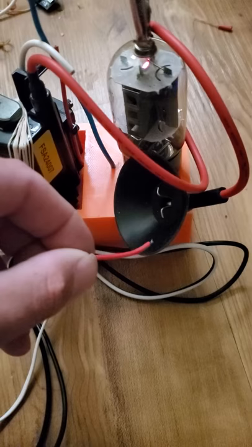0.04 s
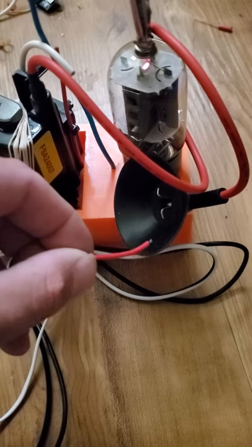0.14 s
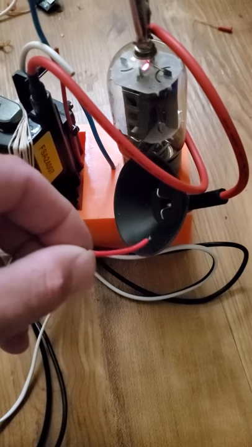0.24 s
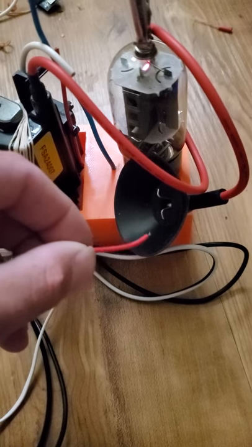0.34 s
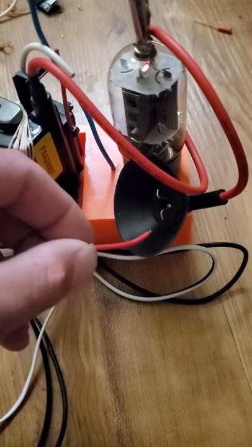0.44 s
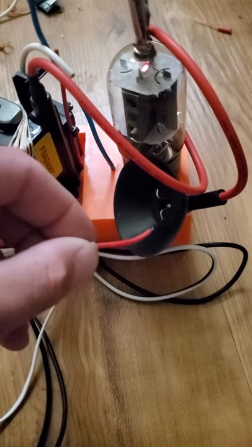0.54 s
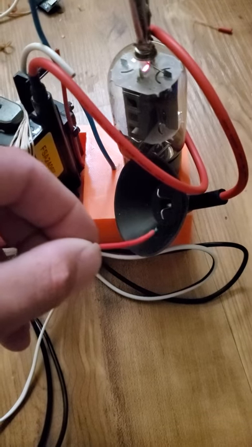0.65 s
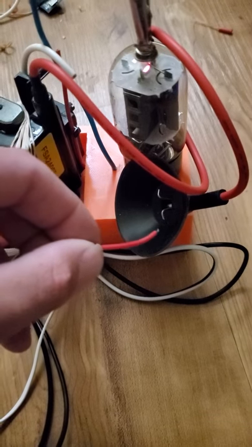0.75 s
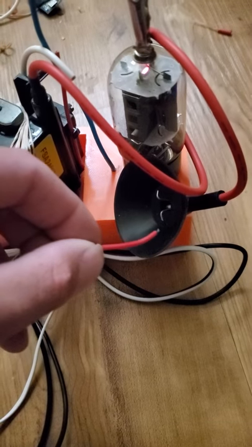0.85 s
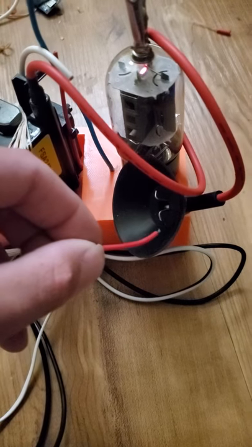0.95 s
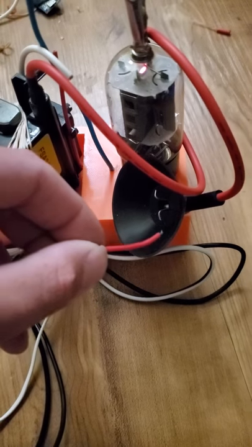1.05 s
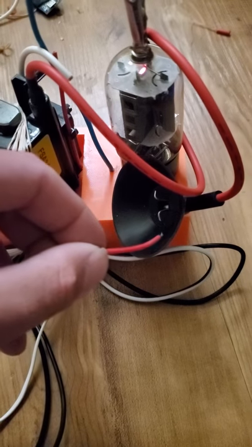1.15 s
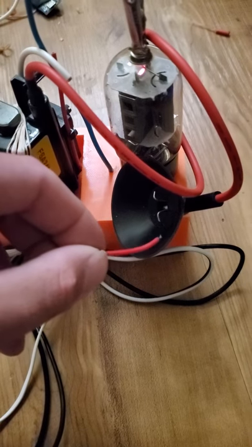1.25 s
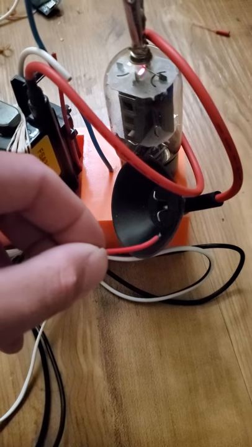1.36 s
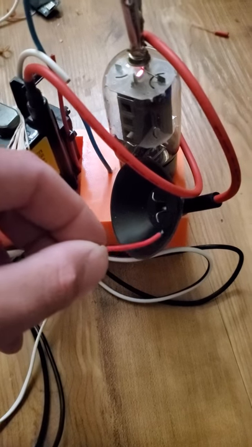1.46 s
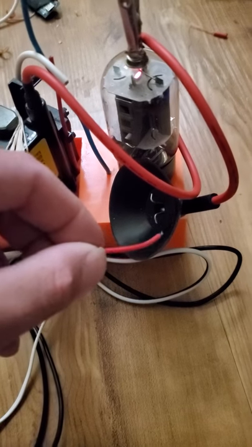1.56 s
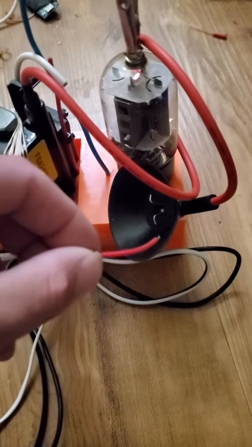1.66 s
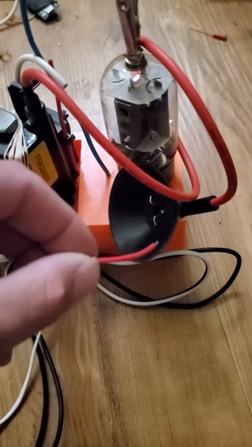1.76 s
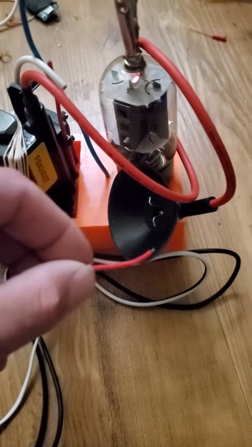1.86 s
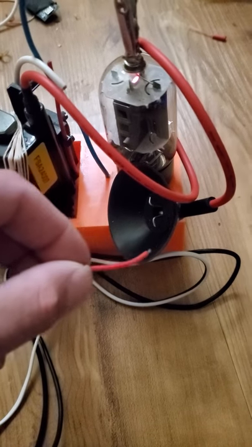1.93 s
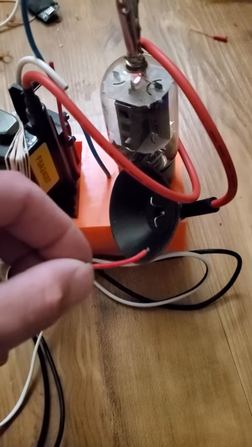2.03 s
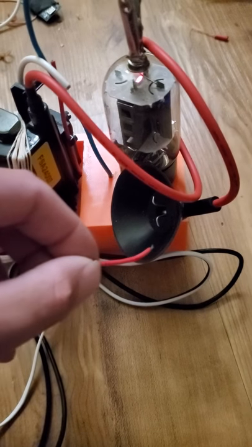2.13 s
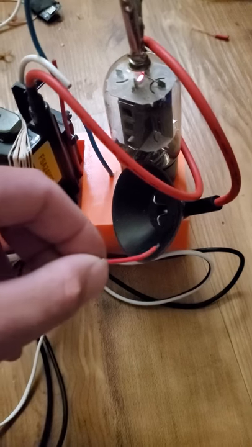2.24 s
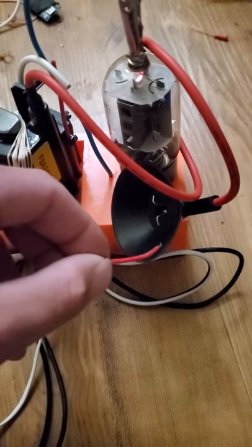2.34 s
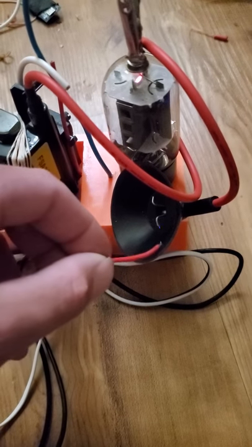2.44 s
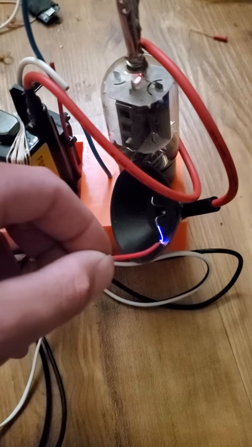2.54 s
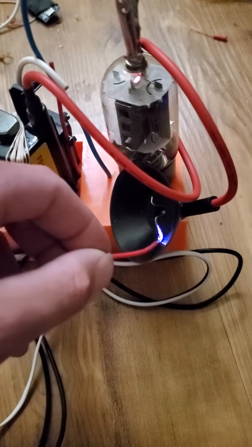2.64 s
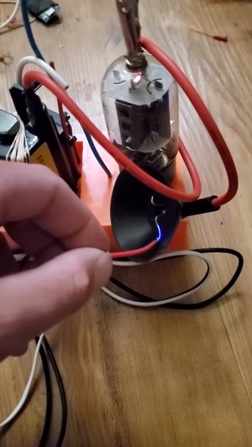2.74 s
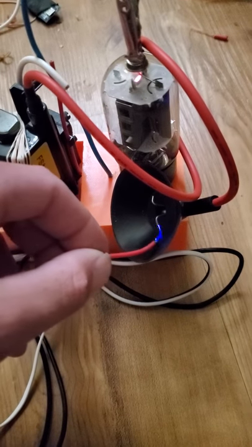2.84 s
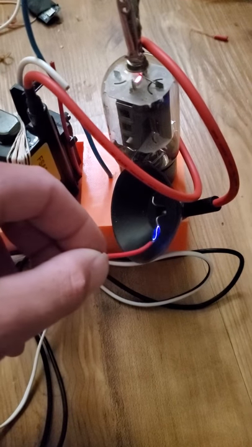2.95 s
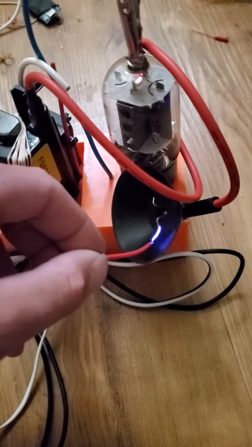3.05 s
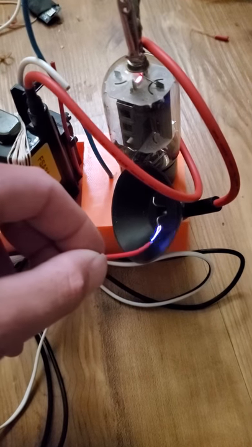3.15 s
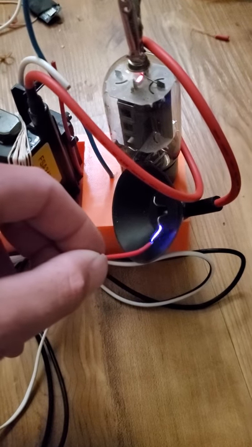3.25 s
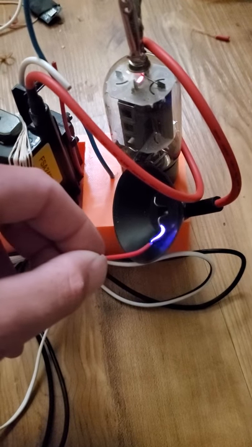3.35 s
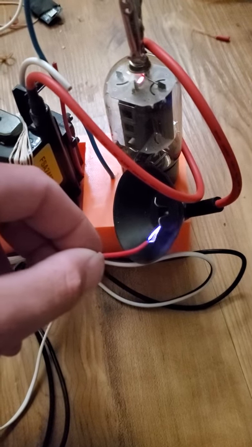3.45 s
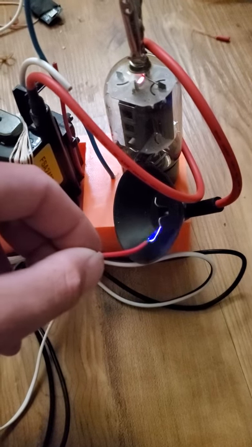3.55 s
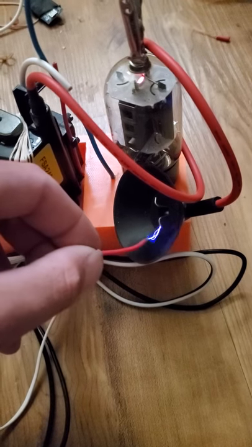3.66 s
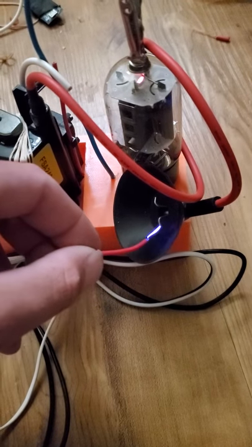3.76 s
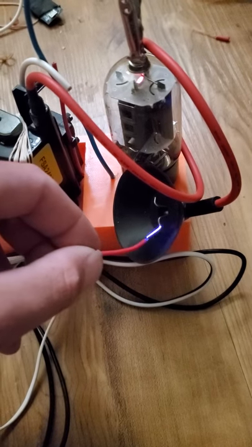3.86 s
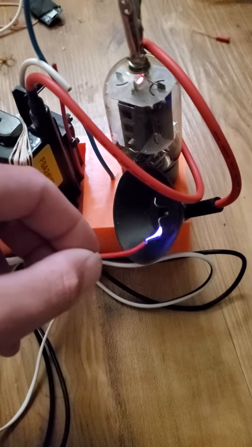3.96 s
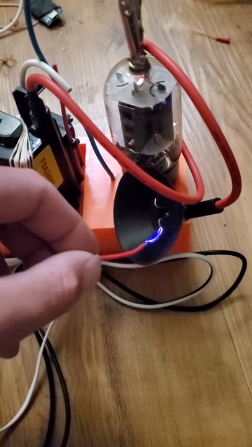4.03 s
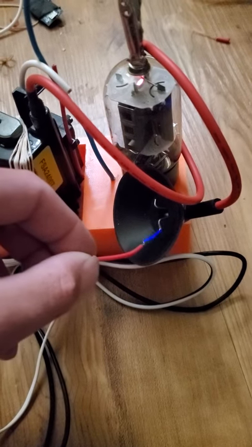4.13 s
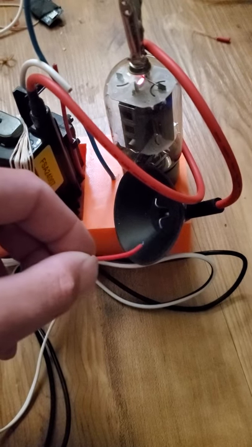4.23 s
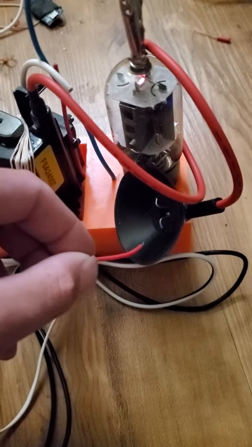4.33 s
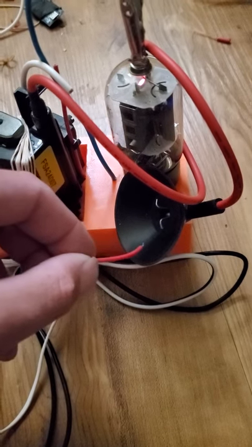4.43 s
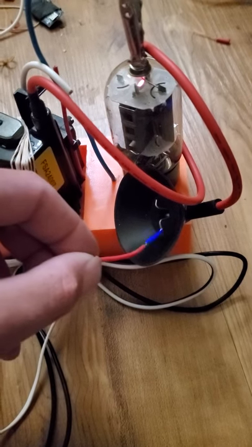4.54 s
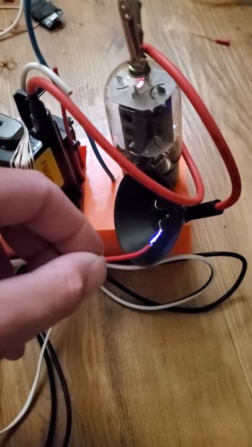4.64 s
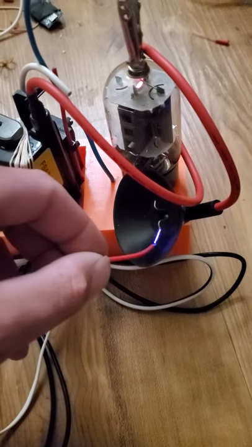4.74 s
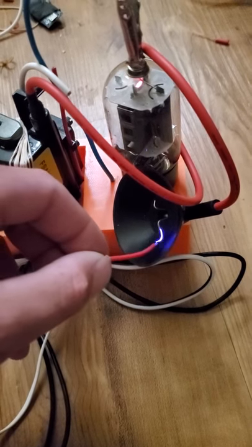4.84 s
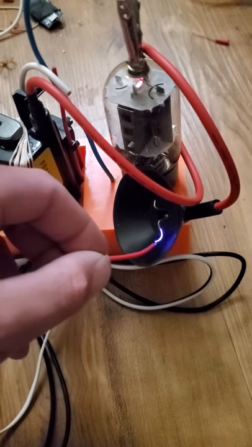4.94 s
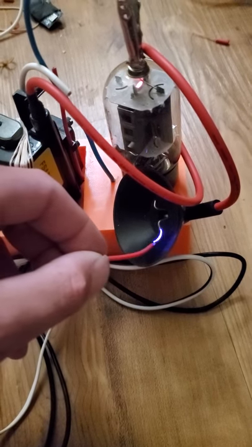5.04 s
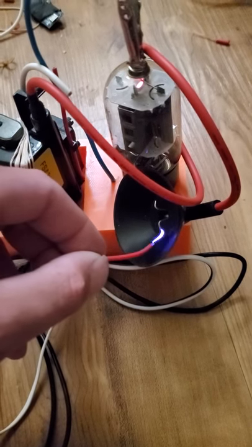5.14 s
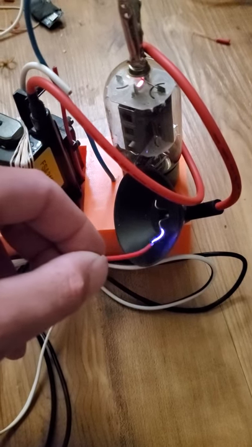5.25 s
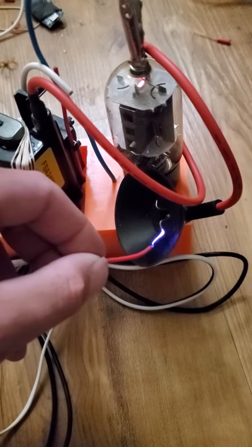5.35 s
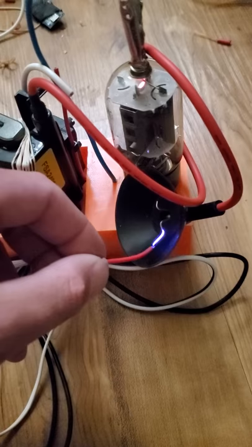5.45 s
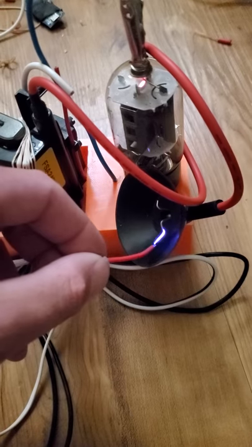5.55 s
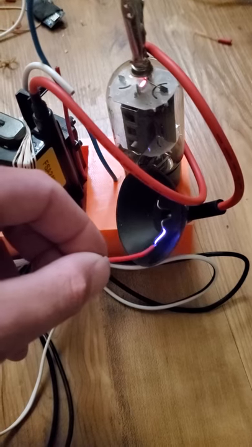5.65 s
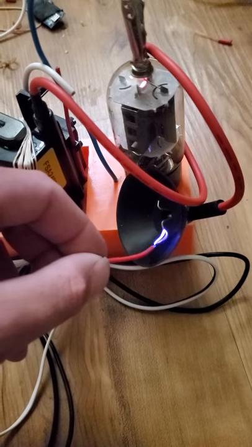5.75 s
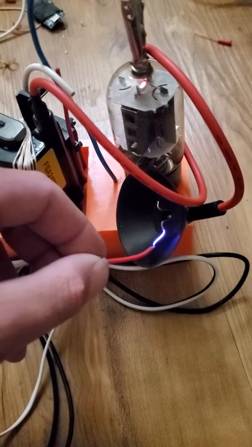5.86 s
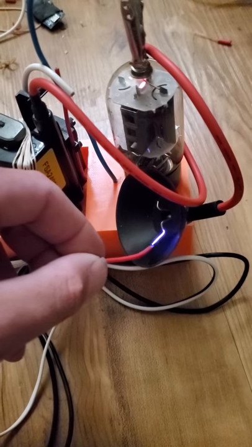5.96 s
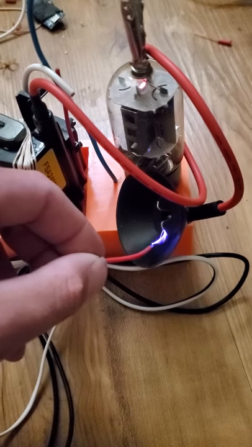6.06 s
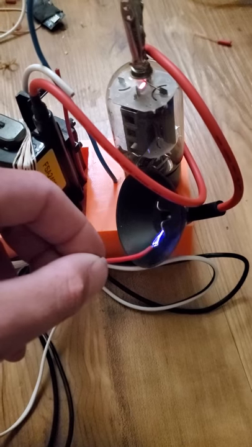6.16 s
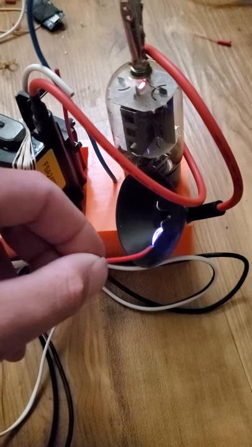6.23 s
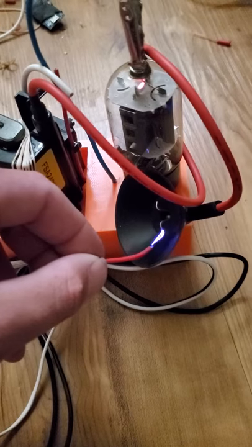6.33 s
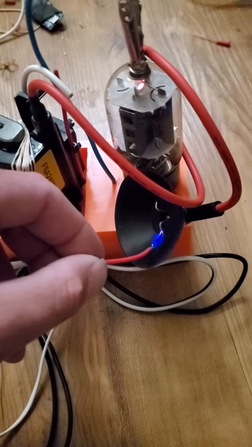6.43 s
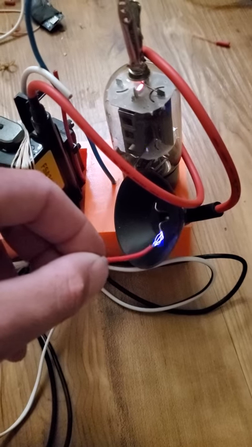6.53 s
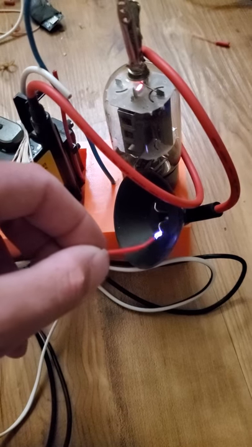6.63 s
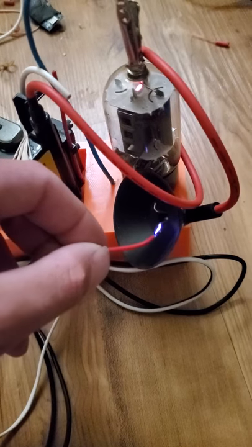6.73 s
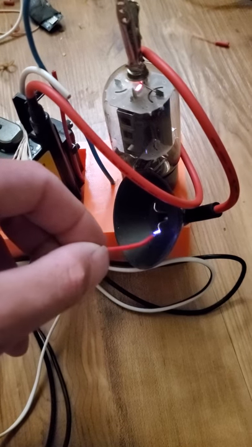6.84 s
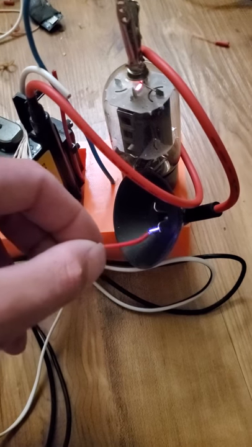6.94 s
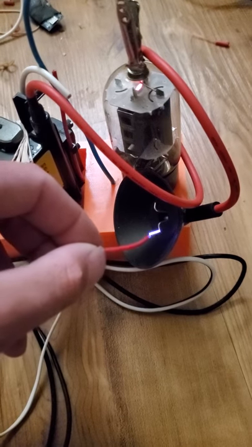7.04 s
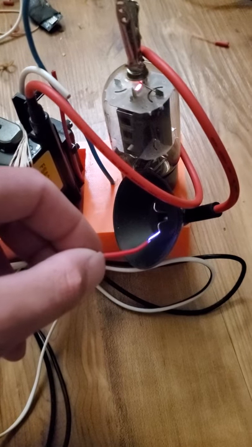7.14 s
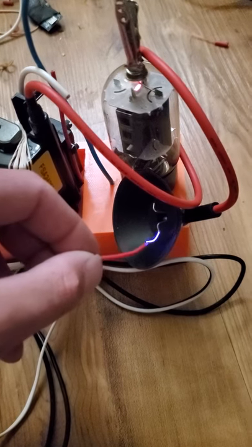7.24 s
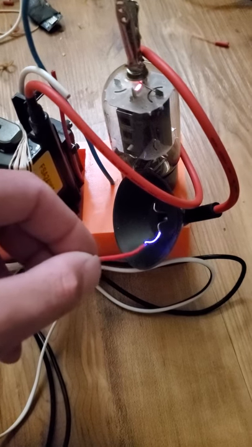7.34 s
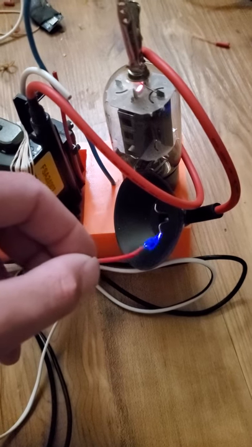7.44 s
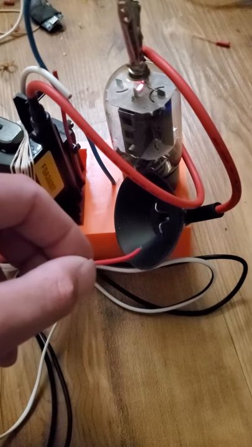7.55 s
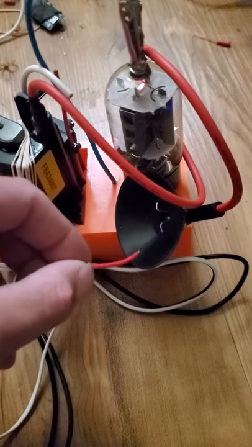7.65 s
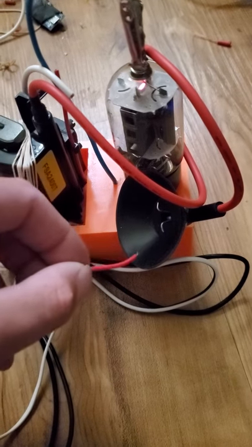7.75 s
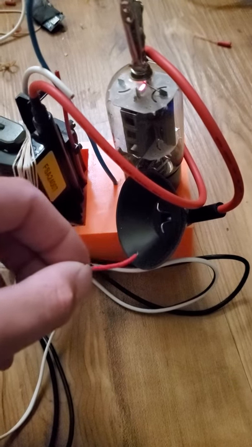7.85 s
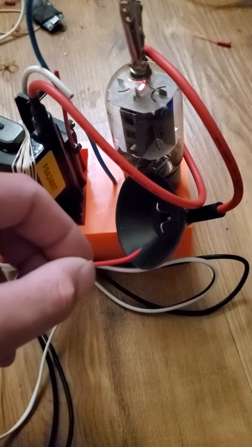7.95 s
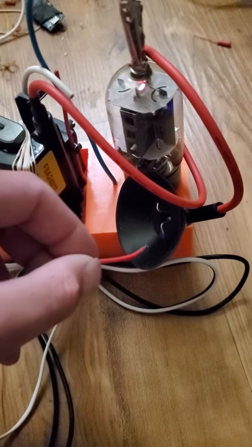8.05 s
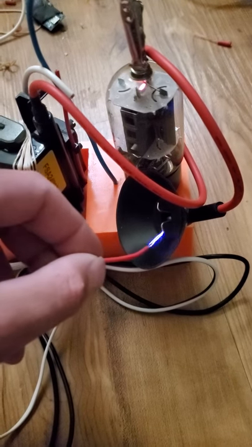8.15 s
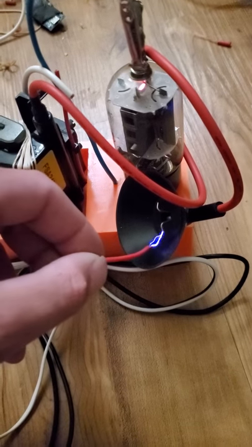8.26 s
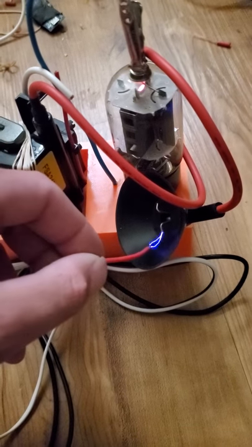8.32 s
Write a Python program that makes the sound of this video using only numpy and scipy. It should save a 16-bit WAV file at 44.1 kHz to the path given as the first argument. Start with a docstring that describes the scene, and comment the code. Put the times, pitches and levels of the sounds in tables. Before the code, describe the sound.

A high-voltage transformer whines thinly at a very high pitch, close and slightly to the left, sinking a little over a faint fan and low mains hum. At about 2.5 seconds a brief hiss leads into sharp snapping sparks, and the background drops. From 3 to 4 seconds loud sizzling arcs alternate with crackles, pushing the whine louder and slightly higher, with flashes of a tone an octave lower. After a lull, sparks snap again around 4.6 seconds and a nearly silent arc holds the whine. From 5.1 to 6.4 seconds the arcs sizzle almost continuously, repeatedly singing the lower tone. A quick volley of sparks at 6.5 seconds becomes a rough, raspy squeal lasting until 7.2. A few snaps follow around 7.4, the idle whine returns, and the last sparks crackle just after 8 seconds. The room sounds small and fairly dry.

```python
"""A valve-driven flyback transformer on a wooden table, left of a hand-held pair of microphones.
It whines near 8 kHz over a fan and mains hum, sinking as the valve warms. At 2.5 s a lead nears the
high-voltage terminal: corona hisses, sparks snap across, then sizzling arcs hold and pull the whine sharp.
At times an arc settles on every second cycle and sings an octave lower. From 6.6 s it restrikes more
slowly in a rough squeal; the idle whine returns, and the last sparks snap just after 8 s."""
import sys
import numpy as np
from scipy import signal
from scipy.fft import rfft, irfft, next_fast_len
from scipy.io import wavfile
from scipy.ndimage import uniform_filter1d

SR = 44100
rng = np.random.default_rng(int(sys.argv[2]) if len(sys.argv) > 2 else 0)


def dump(signal):
    """Clip the signal to [-1, 1] and save it as 16-bit WAV at the path in sys.argv[1]."""
    limited = np.clip(np.atleast_2d(signal).T, -1, 1)
    pcm = np.round(limited * 32767).astype(np.int16)
    wavfile.write(sys.argv[1], SR, pcm)


N = 369999
TIME = np.arange(N) / SR
ARC_EDGE_S = 0.005

# arcs that hold, loud or almost silent: start/s, end/s, whine f/Hz, sizzle level/dB
ARCS = [(3.039, 3.123, 8236, -19.5), (3.205, 3.27, 8290, -22), (3.274, 3.432, 8180, -21),
        (3.482, 3.533, 8230, -21), (3.726, 3.885, 8338, -26.5), (3.886, 4.025, 8280, -23),
        (4.703, 5.101, 8204, -48.5), (5.136, 5.369, 8273, -18.5), (5.372, 5.569, 8349, -18),
        (5.575, 5.754, 8341, -18.5), (5.764, 6.08, 8300, -19), (6.205, 6.384, 8266, -18.5),
        (6.685, 6.731, 8295, -42), (7.204, 7.38, 8224, -46.5)]
# one table a squeal: t/s, restrike f/Hz, level/dB, unevenness/periods
SQUEALS = [
    [(6.613, 3083, -16, 0.072), (6.63, 2960, -17, 0.038), (6.66, 2900, -18.5, 0.083),
     (6.691, 2550, -19, 0.23)],
    [(6.728, 2590, -17, 0.28), (6.8, 2771, -21, 0.19), (6.9, 2888, -21.5, 0.12), (7.0, 3014, -20, 0.049),
     (7.07, 2897, -20, 0.081), (7.15, 2880, -17, 0.12), (7.198, 2738, -20, 0.2)],
]
# decay of the room: f/Hz, t60/s
ROOM_DECAY = [(300, .4), (3000, 0.22), (8000, 0.27), (15000, 0.14)]


def whine(phase, db, lean_db, load, flutter_db=2.5, gain_db=-4):
    """The core sings at the switching rate; the arc's load shakes it. A thin steady tone lies above."""
    core = amp(db + gain_db + flutter_db * load * wander(rate_hz=105)) * pair(phase, lean_db, lead=0.77)
    thin_gain = amp(-68 + 3 * wander(rate_hz=3))
    thin_phase = 2 * np.pi * np.cumsum(15635 + 8 * wander(rate_hz=5)) / SR
    return core + thin_gain * pair(thin_phase, lean_db=-2.5, lead=0.5)


def oscillator(bursts, settled, idle_hz=8042, cold_hz=74.7, warm_up_s=0.65):
    """Pitch, level and lean of the whine: sparks drag it flat, an arc pulls it sharp and loud."""
    # standing waves of the idle whine at the hand-held microphones: t/s, level/dB, left-right/dB
    standing_waves = [(0, -46, 9), (0.1, -53, 16), (0.2, -43, -3), (0.28, -51, 15), (0.42, -41, 11),
                      (0.58, -41.5, 3.5), (1.14, -38.5, 9.5), (1.75, -41.5, 12.5), (2.12, -41, 3),
                      (2.36, -40.5, 2), (2.8, -42.5, 10), (4.2, -47.5, 6), (4.44, -48.5, 13),
                      (7.55, -46, 7.5), (7.8, -44, 9), (8.1, -43.5, 0)]

    def toward(state, share, hz, db, lean_db):
        return [now + np.clip(share, 0, 1) * (new - now) for now, new in zip(state, (hz, db, lean_db))]

    state = [idle_hz + cold_hz * np.exp(-TIME / warm_up_s), *follow(standing_waves, TIME)]
    state = toward(state, nearness(bursts, reach_s=0.054), hz=7970, db=-38.5, lean_db=7.5)
    for start, end, hz, _ in ARCS:
        state = toward(state, gate(start, end, ARC_EDGE_S), hz, db=-32, lean_db=12)
    hz, db, lean_db = toward(state, settled, hz=8146, db=-27.5, lean_db=12)
    squealing = sum(gate(rows[0][0], rows[-1][0], ARC_EDGE_S) for rows in SQUEALS)
    db = db + squealing * (-58 - db)  # a squeal all but stops the whine
    return lag(hz, s=0.009), lag(db, s=0.0095), lag(lean_db, s=0.0095)


def burning(flare_db=4, flare_s=0.03, sputter_db=1.74):
    """Strength of the arc: it flares as it catches and sputters as it burns."""
    held = sum(amp(db + flare_db * np.exp(-abs(TIME - start) / flare_s)) * gate(start, end, ARC_EDGE_S)
               for start, end, _, db in ARCS)
    return held * amp(sputter_db * wander(rate_hz=16))


def sizzle(phase, strength, settled, flicker_db=2, surge_db=1.84, calm_db=8, spit_share=0.014, spit_db=13):
    """The arc reignites on every cycle, each time with another strength; now and then it spits."""
    # spectrum of the arc: f/Hz, level/dB
    spectrum = [(250, -38.5), (700, -32), (1250, -29.5), (1650, -12.5), (2800, -3), (3900, -3.5),
                (4500, -6), (6000, -7), (7600, -13), (9200, -22.5), (10200, 2), (12500, 1.5), (14400, 4.5),
                (15800, -22.5)]
    ignitions = np.flatnonzero(np.diff(np.floor(phase / (2 * np.pi))))
    count = len(ignitions)
    size, late = rng.standard_normal((2, N))[:, :count]
    spits = rng.random(N)[:count] < spit_share
    size = unit(np.where(spits, np.sign(size) * amp(spit_db), size)) * np.sqrt(N / count)
    restless = flicker_db * wander(rate_hz=460) + surge_db * wander(rate_hz=34)
    envelope = strength * amp(-3.5 + restless - calm_db * settled)  # a settled arc hisses less
    size = np.tanh(size * envelope[ignitions])  # one cycle holds only so much charge
    return colour(clicks(ignitions / SR + 1e-5 * late, size), spectrum)


def lengthen(hiss, whine_hz, body_db_per_hz=0.0325, plain_hz=8240, body_hz=6500):
    """A longer arc, told by its sharper whine, sizzles with more body."""
    body = signal.sosfiltfilt(signal.butter(2, body_hz, fs=SR, output="sos"), hiss)
    return hiss + body * (amp(body_db_per_hz * (whine_hz - plain_hz)) - 1)


def settling(edge_s=0.0042, swell_db=5, full_db=-27.5):
    """How settled the arc is (0-1), and the gain of its lower octave, which swells until it breaks up."""
    # the arc settles on every second cycle: start/s, end/s, lower octave level/dB
    locks = [(3.089, 3.113, -31), (3.228, 3.241, -30.5), (3.31, 3.33, -22.5), (3.397, 3.424, -25.5),
             (3.51, 3.525, -22), (3.785, 3.86, -39), (3.966, 4.025, -27), (4.733, 4.747, -35.5),
             (4.802, 4.829, -45), (5.293, 5.365, -25), (5.404, 5.456, -29.5), (5.488, 5.522, -30),
             (5.704, 5.758, -21.5), (5.77, 5.811, -29), (6.027, 6.076, -22.5), (6.256, 6.307, -23.5),
             (6.318, 6.359, -28)]
    settled, gain = np.zeros((2, N))
    for start, end, db in locks:
        at = (TIME > start) & (TIME < end)
        progress = (TIME[at] - start) / (end - start)
        held = gate(start, end, edge_s)[at]
        settled[at] = min(amp(db - full_db), 1) * held
        gain[at] = amp(db + swell_db * (progress - 1 / 2)) * held
    return settled, gain


def undertone(phase, gain, shake_db=5, sputter_db=5, firm_db=-25):
    """Strong and weak cycles alternate, giving half and quarter multiples of the whine."""
    # partials of the settled arc: multiple of the whine, level/dB
    partials = [(1 / 4, -23), (1 / 2, 0), (3 / 4, -20), (5 / 4, -10), (3 / 2, -1), (7 / 4, -8)]
    loose = np.clip(1 - gain / amp(firm_db), 0, 1)  # a weak hold sputters
    sputter = amp(sputter_db * loose * np.minimum(wander(rate_hz=150), 1))
    tones = sum(amp(db + shake_db * wander(rate_hz=12.7)) * pair(k * phase, lean_db=6, lead=1.33)
                for k, db in partials)
    return amp(-2.5) * gain * sputter * tones


def spark_bursts(snap_s=0.001, jitter_s=0.0008, spread_db=1):
    """Every snap across the gap, alone or in a volley, as rows of t/s, length/s, level/dB."""
    # lone bursts of sparks: t/s, length/s, level/dB
    lone_bursts = [(2.5572, 0.002, -14.5), (2.589, 0.0045, -14.5), (2.6206, 0.0051, -15),
                   (2.635, 0.001, -7.5), (2.647, 0.016, -17.5), (2.7496, 0.00046, -14),
                   (2.9167, 0.0007, -13.5), (2.93, 0.0041, -17), (2.942, 0.00056, -10),
                   (2.976, 0.0034, -14), (2.996, 0.00071, -15), (3.039, 0.025, -20.5), (3.155, 0.013, -15),
                   (3.1885, 0.013, -15.5), (3.229, 0.009, -21), (3.3447, 0.00082, -10),
                   (3.3542, 0.02, -18.5), (3.4456, 0.01022, -14), (3.4864, 0.005, -25),
                   (3.5744, 0.0011, -11), (3.5789, 0.029, -16), (3.625, 0.00071, -10.5),
                   (3.643, 0.0016, -14.5), (3.6597, 0.00074, -9), (3.6874, 0.0048, -13.5),
                   (3.7174, 0.0061, -13.5), (4.6645, 0.0082, -14.5), (4.6845, 0.018, -15),
                   (5.106, 0.0074, -23.5), (5.382, 0.013, -21), (5.698, 0.006, -22), (5.761, 0.0097, -15),
                   (5.845, 0.0099, -20.5), (6.0763, 0.0044, -16.5), (6.141, 0.018, -15),
                   (6.189, 0.01268, -15), (6.21, 0.0013, -17), (6.602, 0.0065, -14.5),
                   (7.372, 0.00204, -24.5), (7.395, 0.0065, -14), (7.424, 0.0024, -18),
                   (7.444, 0.0015, -12.5), (8.1432, 0.0018, -13.5), (8.1725, 0.01, -15),
                   (8.203, 0.0098, -18), (8.2264, 0.014, -16), (8.342, 0.00087, -17)]
    # the gap recharges and snaps over and over: start/s, end/s, snap rate/Hz, level/dB
    volleys = [(2.668, 2.694, 94, -19.5), (3.011, 3.038, 227, -13.5), (3.549, 3.567, 170, -13.5),
               (3.697, 3.715, 170, -17), (4.633, 4.658, 112, -13.5), (6.099, 6.128, 175, -10),
               (6.516, 6.595, 105, -12.5), (8.2527, 8.322, 99, -15)]
    bursts = list(lone_bursts)
    for start, end, rate, db in volleys:
        chance = rng.standard_normal((64, 2))
        for s, (late, size) in zip(np.arange(start, end, 1 / rate), chance):
            bursts.append((s + jitter_s * late * (s > start), snap_s, db + spread_db * size))
    return bursts


def sparks(bursts, strikes_hz=4500, spread_db=3, fade_db=2):
    """Each burst is a run of uneven breakdowns that fades a little."""
    # spectrum of a spark: f/Hz, level/dB
    spectrum = [(150, -28.5), (400, -33), (650, -20), (1100, -24.5), (1700, -10.5), (3000, -4.5),
                (5000, -15), (7000, -12), (9000, -11.5), (10500, 3.5), (13000, 3.5), (14800, 6),
                (16000, -8.5)]
    times, sizes = [], []
    for s, length, db in bursts:
        late, chance = rng.random(1024), rng.standard_normal(1024)
        k = np.arange(max(3, round(length * strikes_hz)))
        size = amp(spread_db * chance[k] - fade_db * k / len(k))
        polarity = rng.choice([-1, 1], size=1024)[k]
        times.append(s + (k + late[k]) * length / len(k))
        sizes.append(amp(db) * polarity * size / np.linalg.norm(size) * np.sqrt((length + 0.00072) * SR))
    limited = 2 * np.tanh(np.concatenate(sizes) / 2)
    return colour(clicks(np.concatenate(times), limited), spectrum)


def squeal(flicker_db=2.5, spread_db=3, drift_share=0.33, scatter_share=0.38, rasp_db=-4):
    """The gap recharges and breaks down about 3000 times a second, never quite evenly, and rasps."""
    # spectrum of the squeal: f/Hz, level/dB
    spectrum = [(250, -18.5), (1250, -23), (1700, -13.5), (2600, -11), (3200, -9.5), (4400, -5.5),
                (5900, -7), (7800, -12.5), (9500, -14.5), (11300, -2), (13500, -1), (14800, 3.5),
                (15800, -16)]
    train = np.zeros(N)
    for rows in SQUEALS:
        t = np.arange(rows[0][0], rows[-1][0], 1 / SR)
        slip, late, size = rng.standard_normal((3, SR))
        cycles = np.cumsum(follow(rows, t)[0]) / SR
        k = np.arange(int(cycles[-1]))
        hz, db, uneven = follow(rows, np.interp(k, cycles, t))
        # part of each delay carries over to the next breakdown, part does not
        delay = drift_share * np.cumsum(uneven * slip[k]) + scatter_share * uneven * late[k]
        times = np.interp(k + delay, cycles, t)
        inside = (times > t[0]) & (times < t[-1])
        train += clicks(times, amp(db + spread_db * size[k]) * np.sqrt(SR / hz) * inside)
    low = signal.sosfilt(signal.butter(2, [1500, 4600], "band", fs=SR, output="sos"), train)
    high = signal.sosfilt(signal.butter(2, 4200, "high", fs=SR, output="sos"), train)
    # the restless channel smears the lowest partial into a broad band
    rough = high + low * (1 + amp(rasp_db) * np.sqrt(2) * wander(rate_hz=610))
    return colour(rough * amp(-2 + flicker_db * wander(rate_hz=1240)), spectrum)


def corona(bursts, rise_s=0.06, linger_s=0.022, linger_db=-30):
    """Strength of the faint discharge that grows until the gap breaks down and lingers after a spark."""
    # the lead closes in on the terminal: breakdown t/s, level/dB
    approaches = [(2.556, -33), (4.632, -36.5), (5.135, -29.5), (6.515, -40.5), (8.143, -41)]
    growing = sum(amp(db) * np.clip(1 + (TIME - s) / rise_s, 0, 1) * (TIME < s) for s, db in approaches)
    times = np.sort([-1] + [s for s, _, _ in bursts])
    since_spark = TIME - times[np.searchsorted(times, TIME) - 1]
    return growing + amp(linger_db) * np.exp(-since_spark / linger_s)


def at_microphones(x, lead_s=0.0001274, table_db=-2, table_t60=0.035, room_db=-6):
    """Direct sound from the left, quick reflections off table and apparatus, then the room."""
    # balance of the discharge across the pair: f/Hz, left-right/dB
    balance = [(300, -1), (1000, -5.5), (2000, 2.5), (4000, 1), (8000, 3), (10800, -1), (12500, 4.5),
               (15000, 16)]
    size = next_fast_len(N + SR // 2)
    hz = np.fft.rfftfreq(size, 1 / SR)
    lean = amp(np.array([[1], [-1]]) * read(balance, hz) / 2)
    lean = lean / np.sqrt(np.mean(lean ** 2, axis=0))
    direct = np.array([np.ones(len(hz)), np.exp(-2j * np.pi * hz * lead_s)])
    # the arc dances about, so its near reflections keep changing
    places = np.array([wander(rate_hz=17.5) for _ in range(3)])
    places = places / np.linalg.norm(places, axis=0)
    near = sum(signal.oaconvolve((x * share)[None], reflections(0.0003, [(1, table_t60)]), axes=1)[:, :N]
               for share in places)
    room = amp(room_db) * rfft(reflections(0.007, ROOM_DECAY), size)
    direct_and_room = rfft(x, size) * (lean * direct + np.sqrt(lean) * room)
    return irfft(direct_and_room + amp(table_db) * lean * rfft(near, size), size)[:, :N]


def reflections(start_s, t60):
    """Random reflections, other ones at each microphone, dying band by band; energy 1."""
    hz, t, bands = signal.stft(rng.standard_normal((2, SR // 2)), SR, nperseg=128)
    tail = signal.istft(bands * amp(-60 * t / read(t60, hz)[:, None]), SR, nperseg=128)[1]
    tail = np.pad(tail, ((0, 0), (int(start_s * SR), 0)))
    return tail / np.linalg.norm(tail, axis=1, keepdims=True)


def fan(air, shaft_hz=87.34, blades=4, chop=0.25, air_db=-52):
    """The fan sings at multiples of its shaft speed, and its blades chop the rush of air."""
    # fan tones: multiple of the shaft speed, level/dB
    orders = [(1, -61.5), (10, -72), (16, -74.5), (20, -76), (24, -75), (25, -72), (27, -76.5), (28, -67),
              (30, -66.5), (32, -68.5), (35, -75.5), (50, -80.5)]
    shaft = 2 * np.pi * np.cumsum(shaft_hz * (1 + 0.0003 * wander(rate_hz=3.8))) / SR
    rush = signal.sosfilt(signal.butter(2, 600, "high", fs=SR, output="sos"), air)
    tones = sum(amp(db) * pair(k * shaft + 2 * np.pi * rng.random(), lean_db=0, lead=-min(k / 25, 1))
                for k, db in orders)
    return amp(air_db) * (air + chop * rush * np.cos(blades * shaft)) + tones


def room_air():
    """Room rumble and the fan's rush, partly alike at the two microphones; rms 1."""
    # spectrum of the air: f/Hz, level/dB
    spectrum = [(20, -20.5), (45, 2.5), (85, 8.5), (120, 0.5), (160, -11.5), (290, -4.5), (450, -13),
                (1000, -13.5), (2500, -4), (3300, -17), (7500, -21), (9000, -55.5), (12000, -30),
                (14500, -58)]
    # resonances in the fan's rush: f/Hz, width/Hz, level/dB
    resonances = [(610, 240, 7.5), (1074, 197, 13), (1462, 130, 10.5), (1980, 99, 5.5), (4240, 1500, -1.5),
                  (5680, 170, 11)]
    # likeness of the air across the pair: f/Hz, correlation
    likeness = [(60, 1), (150, 0.88), (380, 0.048), (950, 0.012), (2380, -0.87), (5980, 0.26),
                (15000, 0.77)]
    size = next_fast_len(N)
    hz = np.fft.rfftfreq(size, 1 / SR)
    left, other = rfft(rng.standard_normal((2, size)))
    same = read(likeness, hz)
    right = same * left + np.sqrt(1 - same ** 2) * other
    peaks_db = sum(db / (1 + (2 * (hz - f) / width) ** 2) for f, width, db in resonances)
    return unit(irfft(np.array([left, right]) * amp(read(spectrum, hz) + peaks_db), size)[:, :N])


def hum():
    """Mains hum and a low drone, dead centre."""
    # steady low tones: f/Hz, level/dB
    tones = [(104.4, -63), (120, -60.5), (157, -73), (240, -74), (354, -77.5), (358.6, -69)]
    return sum(amp(db) * np.sqrt(2) * np.sin(2 * np.pi * f * TIME + 0.5 * wander(rate_hz=2.3))
               for f, db in tones)


def room_tone():
    """Fan, air and hum together; their level drops at the first sparks and stays low."""
    # course of the room tone: t/s, level/dB
    levels = [(0, 1.5), (2.54, 0.5), (2.62, -8), (4.3, -6.5), (8.39, -5.5)]
    return amp(follow(levels, TIME)[0]) * (fan(room_air()) + hum())


def amp(db):
    """Decibels to gain."""
    return 10 ** (np.asarray(db) / 20)


def unit(x):
    """Scales to rms 1."""
    return x / np.sqrt(np.mean(x ** 2) + 1e-20)


def read(points, hz):
    """Reads a spectrum on a log-frequency axis."""
    f, value = np.transpose(points)
    return np.interp(np.log(hz + 1), np.log(f + 1), value)


def follow(rows, t):
    """Reads every column of a curve at the times t."""
    s, *columns = np.transpose(rows)
    return [np.interp(t, s, column) for column in columns]


def wander(rate_hz):
    """Random drift of rms 1, rolling off above the rate."""
    size = next_fast_len(N)
    hz = np.fft.rfftfreq(size, 1 / SR)
    return unit(irfft(rfft(rng.standard_normal(size)) / (1 + (hz / rate_hz) ** 4), size)[:N])


def clicks(s, size):
    """Band-limited impulses at their exact times."""
    at = np.asarray(s)[:, None] * SR
    taps = np.floor(at).astype(int) + np.arange(-5, 7)
    shape = np.sinc(taps - at) * np.cos(np.pi * (taps - at) / 12) ** 2
    return np.bincount(np.clip(taps, 0, N - 1).ravel(), (shape * size[:, None]).ravel(), N)


def colour(x, points, size=2048):
    """Causal filter of energy 1 with the given spectrum."""
    log_gain = np.log(amp(read(points, abs(np.fft.fftfreq(size, 1 / SR)))))
    taps = np.fft.ifft(np.exp(np.conj(signal.hilbert(log_gain)))).real
    return signal.oaconvolve(x, taps / np.linalg.norm(taps))[:N]


def pair(phase, lean_db, lead):
    """A tone at the two microphones, the left louder by lean_db and ahead by lead radians."""
    left = amp(lean_db / 2) * np.sin(phase + lead / 2)
    right = amp(-lean_db / 2) * np.sin(phase - lead / 2)
    return np.sqrt(2) * np.array([left, right])


def gate(start, end, edge_s):
    """1 between start and end, with straight edges."""
    return np.clip(np.minimum(TIME - start, end - TIME) / edge_s, 0, 1)


def lag(x, s):
    """Follows x with the given time constant."""
    pole = np.exp(-1 / (s * SR))
    return x[0] + signal.lfilter([1 - pole], [1, -pole], x - x[0])


def nearness(bursts, reach_s):
    """1 at every spark, falling to 0 away from it."""
    t = TIME[::64]
    away_s = abs(t[:, None] - np.array(bursts)[:, 0]).min(axis=1)
    return np.exp(-(np.interp(TIME, t, away_s) / reach_s) ** 2)


def scene(shake_hz=22, sway_hz=24, ring_db=-14, stray_db=-22, stray_swing_db=4):
    """One oscillator drives whine, undertone and sizzle; sparks and squeal join them over the room tone."""
    bursts = spark_bursts()
    settled, octave_gain = settling()
    arc = burning()
    hz, db, lean_db = oscillator(bursts, settled)
    strength = arc + corona(bursts)
    load = np.clip(uniform_filter1d(strength, size=400) / amp(-44), 0, 1)
    wobble_hz = load * (shake_hz * wander(rate_hz=110) + sway_hz * wander(rate_hz=14))
    phase = 2 * np.pi * np.cumsum(hz + wobble_hz) / SR
    # a loud arc keeps half settling
    stray_gain = arc * amp(stray_db + stray_swing_db * np.minimum(wander(rate_hz=26), 1))
    octave = undertone(phase, np.maximum(octave_gain, stray_gain))
    room_ring = amp(ring_db) * signal.oaconvolve(octave, reflections(0.007, ROOM_DECAY), axes=1)[:, :N]
    discharge = lengthen(sizzle(phase, strength, settled), hz) + squeal() + sparks(bursts)
    return whine(phase, db, lean_db, load) + octave + room_ring + at_microphones(discharge) + room_tone()


def record(dry):
    """Clips at full scale and cuts the treble above 16 kHz."""
    lowpass = signal.firwin(255, 16000, window=("kaiser", 8), fs=SR)
    return signal.oaconvolve(np.clip(dry, -1, 1), lowpass[None], "same")


dry = scene()
out = record(dry)
dump(out)
```